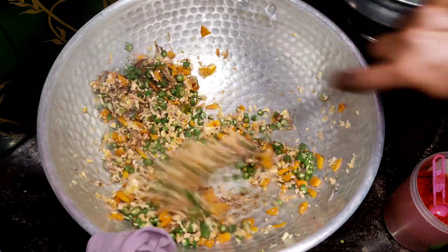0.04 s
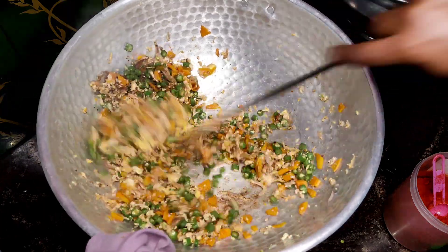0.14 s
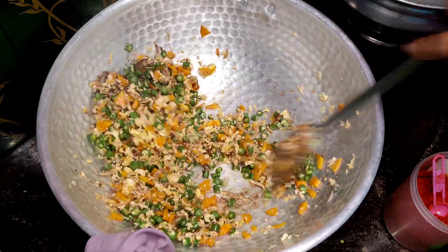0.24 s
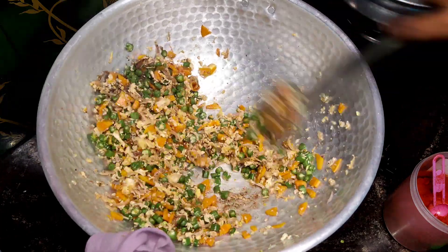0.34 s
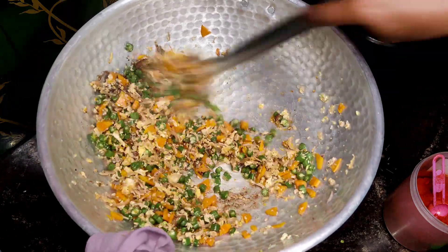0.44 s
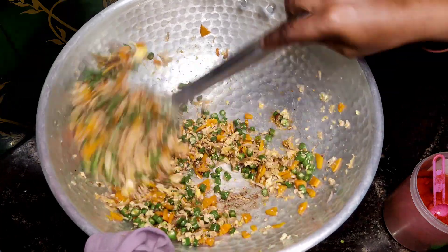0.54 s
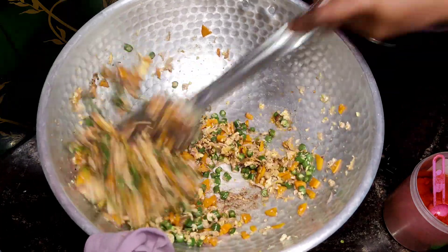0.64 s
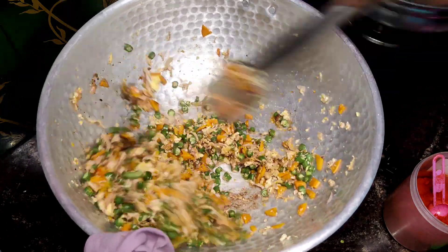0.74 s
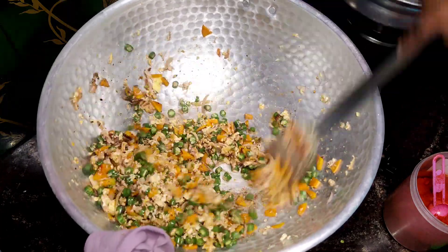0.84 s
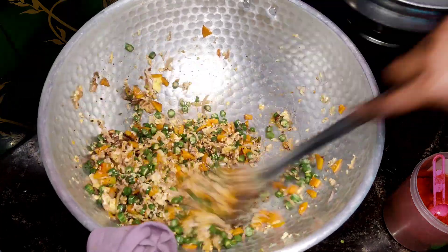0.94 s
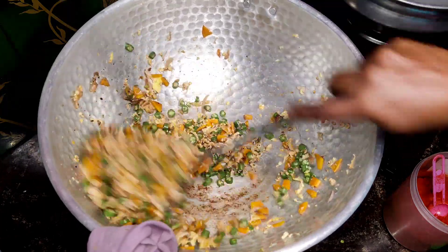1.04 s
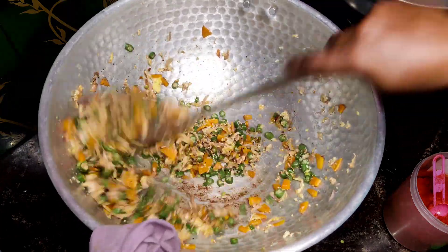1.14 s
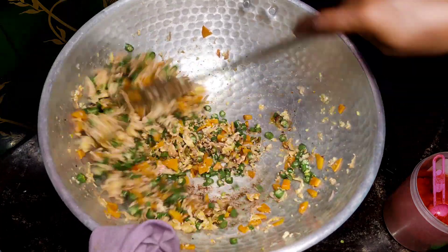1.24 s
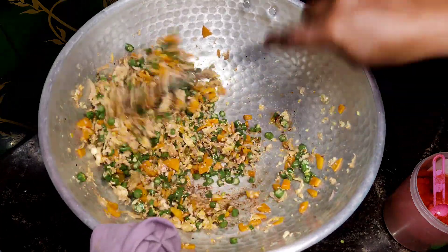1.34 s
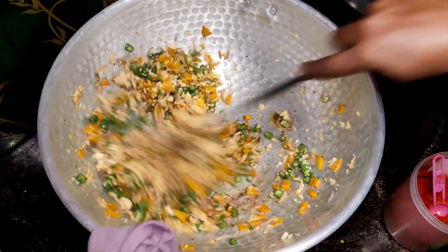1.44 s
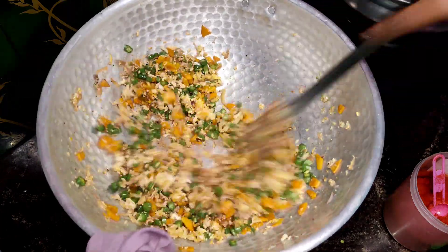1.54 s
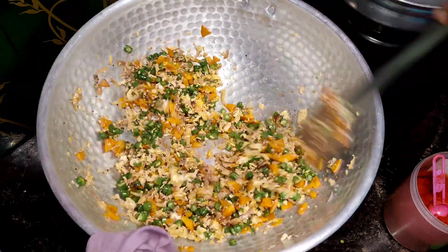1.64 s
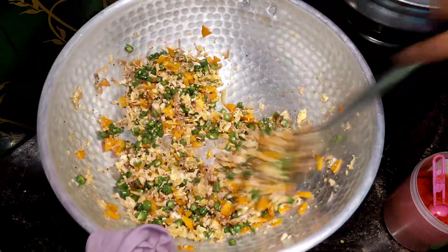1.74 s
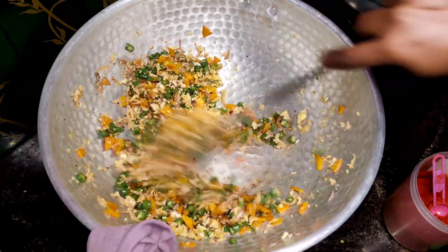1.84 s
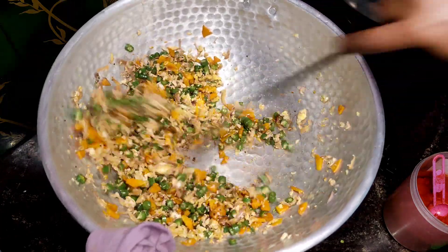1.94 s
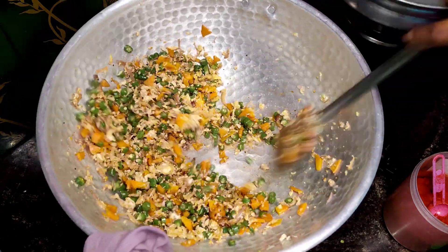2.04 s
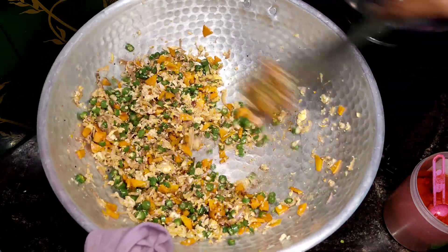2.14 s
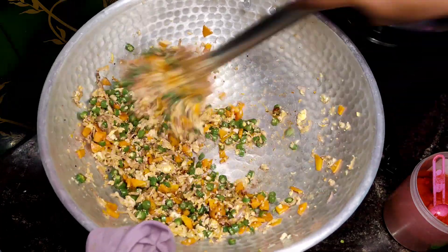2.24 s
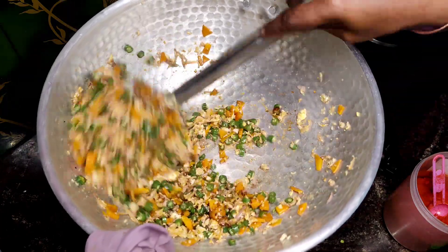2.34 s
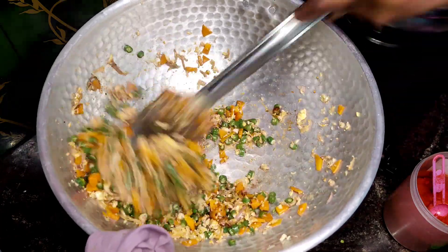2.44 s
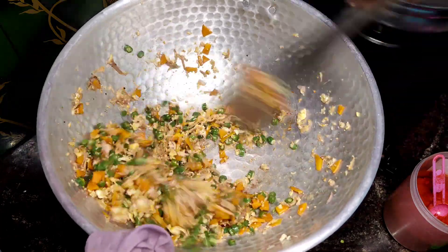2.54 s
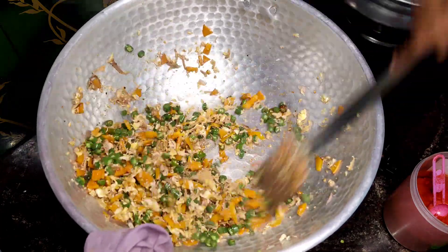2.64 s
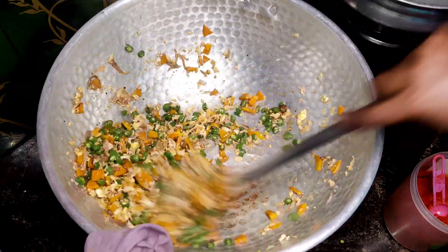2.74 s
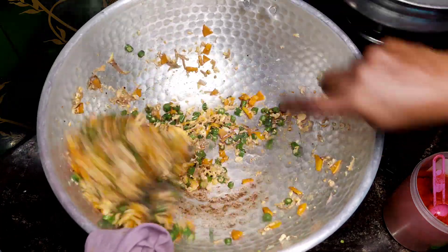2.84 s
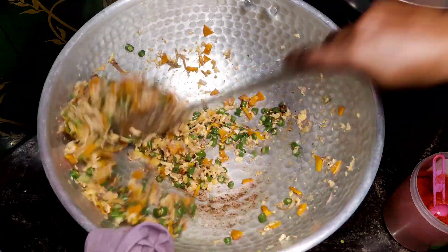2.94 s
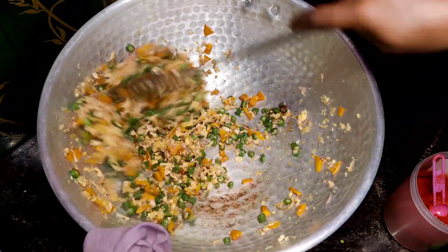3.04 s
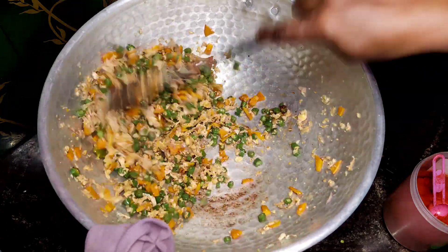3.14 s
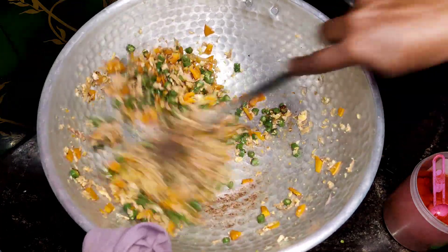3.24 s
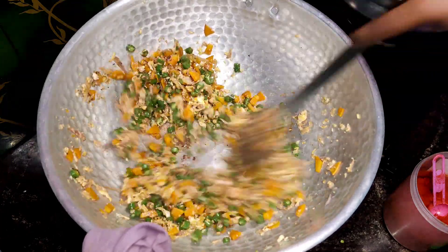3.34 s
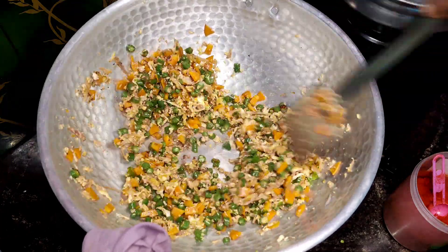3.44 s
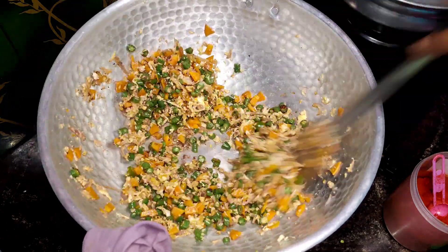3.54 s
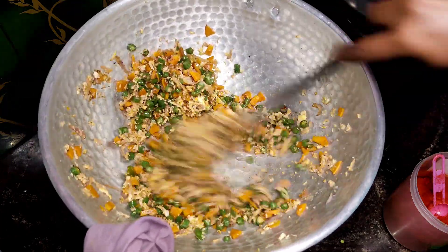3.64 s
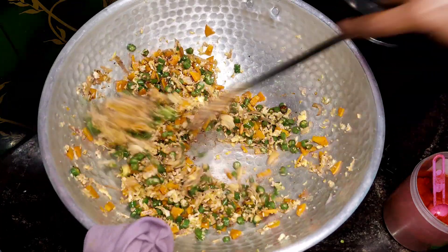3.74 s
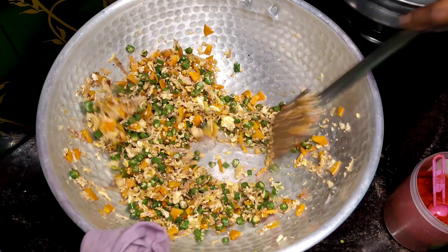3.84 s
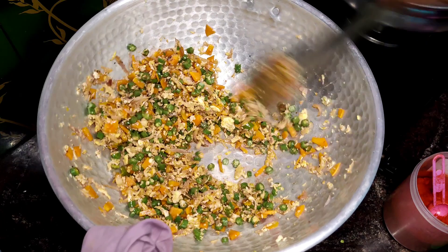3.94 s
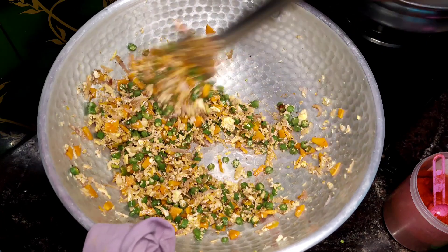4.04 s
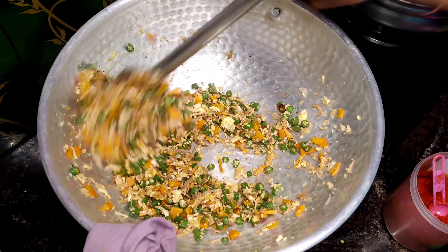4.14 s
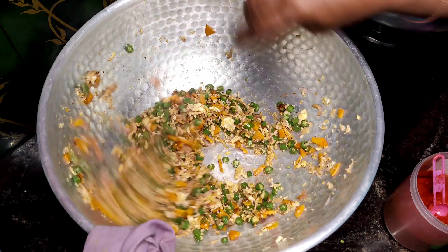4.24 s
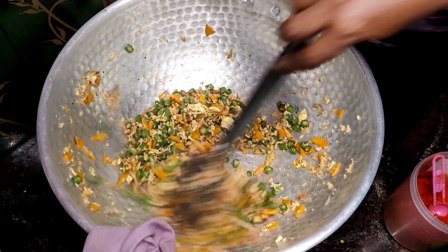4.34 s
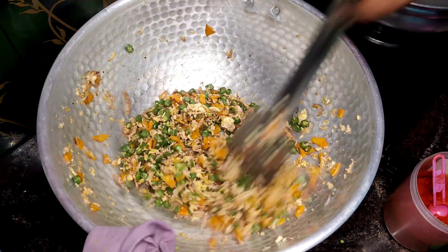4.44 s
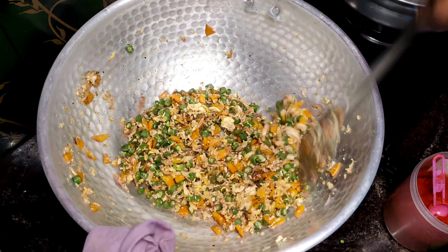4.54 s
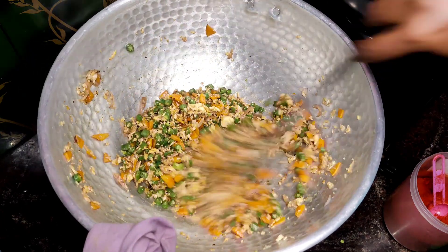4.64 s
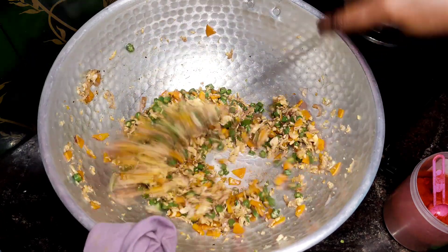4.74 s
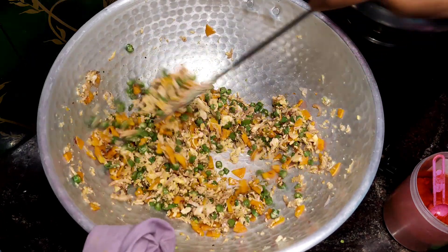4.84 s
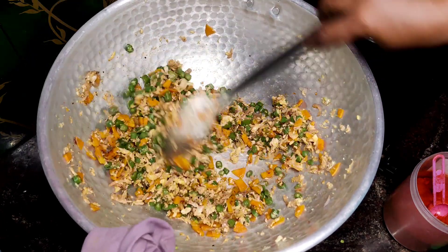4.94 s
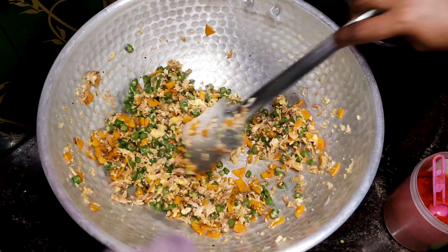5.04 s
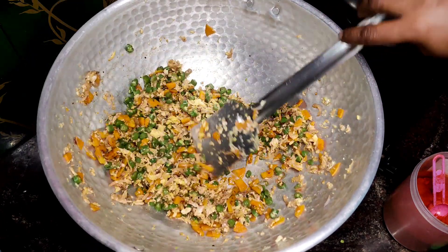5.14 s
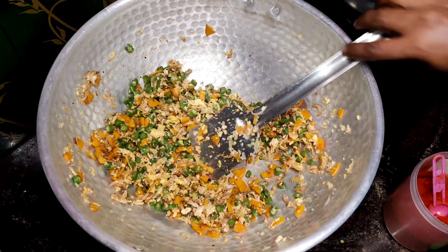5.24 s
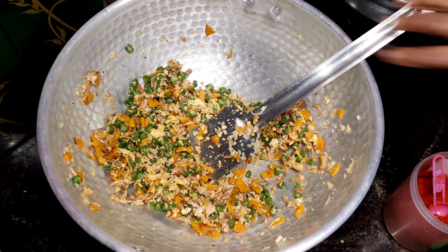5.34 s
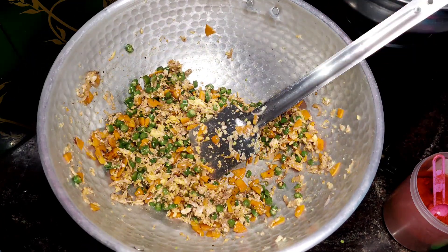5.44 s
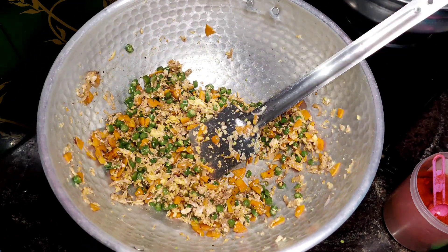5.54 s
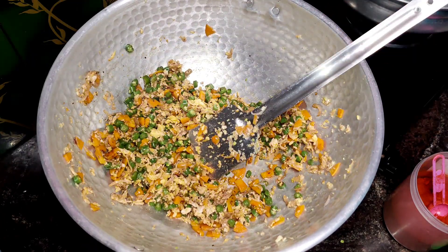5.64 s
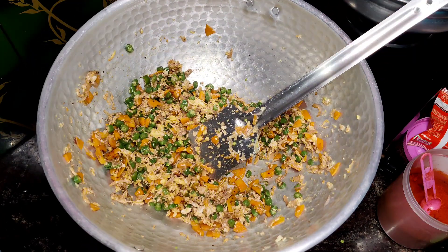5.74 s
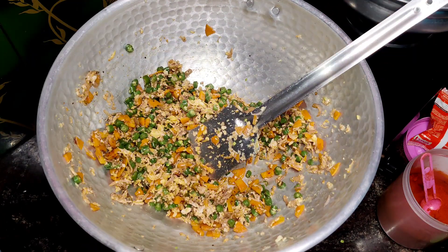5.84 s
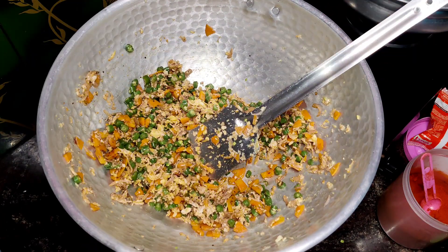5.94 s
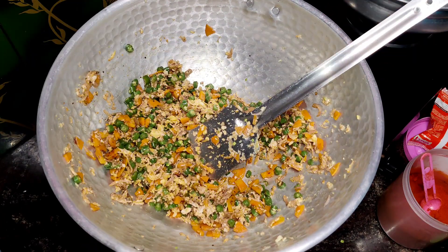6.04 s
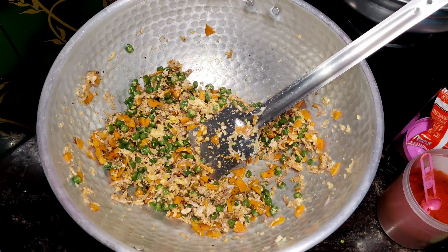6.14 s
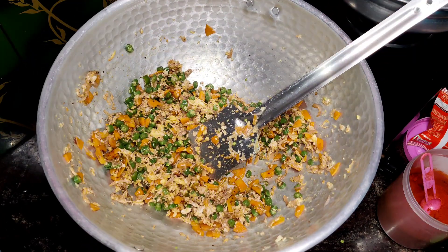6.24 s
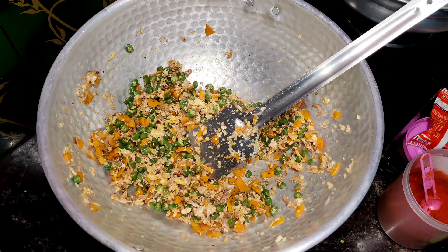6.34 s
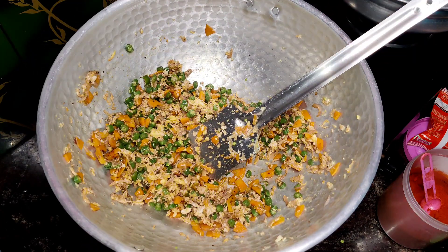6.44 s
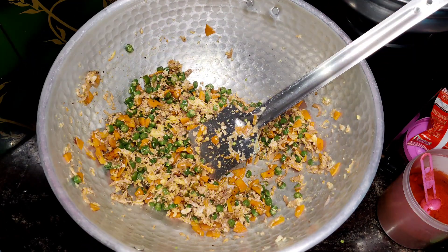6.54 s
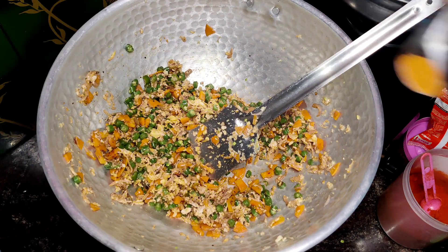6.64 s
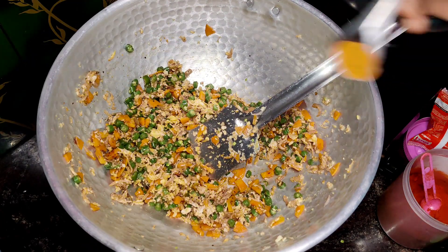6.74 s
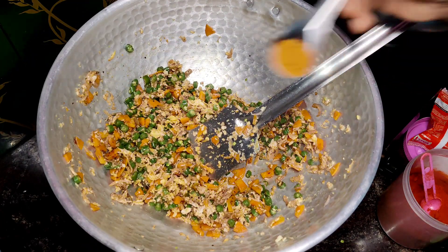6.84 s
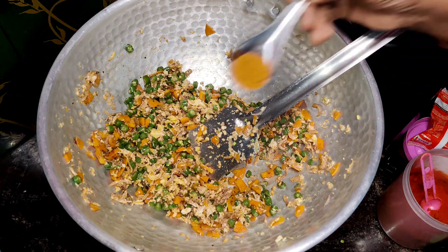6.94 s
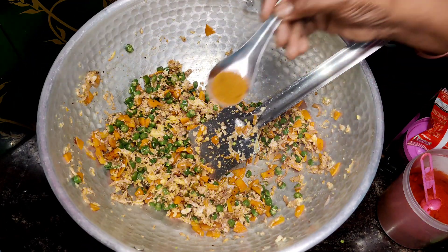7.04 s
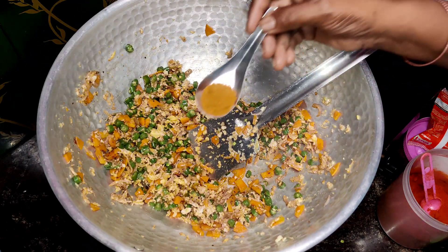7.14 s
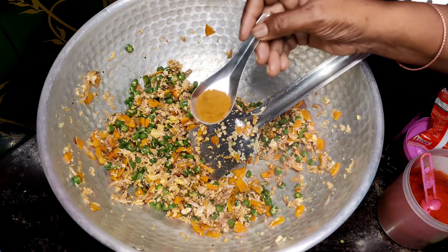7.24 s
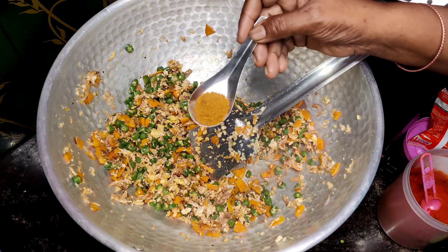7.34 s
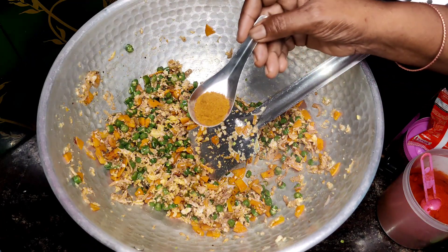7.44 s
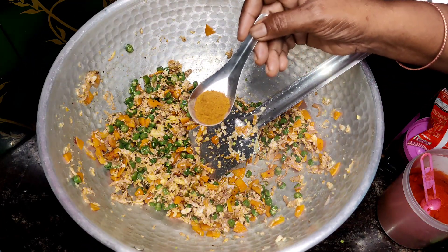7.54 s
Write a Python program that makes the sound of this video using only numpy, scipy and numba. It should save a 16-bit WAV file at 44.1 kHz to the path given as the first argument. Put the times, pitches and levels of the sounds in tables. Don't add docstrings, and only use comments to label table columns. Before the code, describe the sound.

Brisk steel clacks and short gritty scrapes in a frying pan, a last ringing clank, then a jar softly set down amid faint sizzle.

```python
import sys
import numpy as np
from numba import njit
from scipy import signal
from scipy.fft import rfft, irfft
from scipy.io import wavfile
from scipy.ndimage import uniform_filter1d

SR = 44100
rng = np.random.default_rng(int(sys.argv[2]) if len(sys.argv) > 2 else 0)


def transcribe(signal):
    frames = np.atleast_2d(signal).T
    limited = np.clip(frames, -1, 1)
    pcm = np.round(limited * 32767).astype(np.int16)
    wavfile.write(sys.argv[1], SR, pcm)


def level_to_linear(level):
    exponent = np.asarray(level, float) / 20
    return 10 ** exponent


N = 335160
TIME = np.arange(N) / SR

# start_s, edge_peak_db, middle_relative_db, bowl_relative_db
BLOWS = [(.001, -18, -17, -22), (0.0523, -26.5, -12, -7.5), (0.081, -17, -10, -10.5),
         (0.1118, -29, -8, -29), (0.2253, -40.5, -8, 5), (0.424, -28.5, 5, 0.5), (0.8721, 0, -15.5, -19.5),
         (0.9918, -18, -0.5, -14), (1.432, -20.5, -21, -9), (1.5871, -43, 2, 5),
         (1.7428, -11.5, -7.5, -15.5), (1.75, 0, -13, -18.5), (2.0606, -25, -6, -1),
         (2.155, -2.5, -18.5, -19.5), (2.2983, -16, -6, -23), (2.4309, -48, -13, 11),
         (2.6299, -3.5, -8, -13), (3.2077, -18.5, -9.5, 7), (3.2198, -24, -15, 10),
         (3.564, -12, -15, -24.5), (3.8653, -24.5, -1.5, -0.5), (3.9676, -15.5, -10, -14),
         (4.0143, -15, -19, -19), (4.2005, -32, 7, 8), (4.2653, -21, -11, 6), (4.2915, -26.5, -1, 8),
         (4.6848, -13, -20, -10), (4.7149, -11.5, 1.5, -22), (5.3261, -5, -4.5, -18.5)]
# full_pressure_s, end_s, edge_hiss_db, middle_relative_db, bowl_relative_db
SCRAPES = [(0.07, 0.104, -31.5, 1, -11), (0.439, 0.561, -27.5, -4, -1.5), (0.667, 0.67, -45, -18, 2),
           (0.979, 1.069, -30.5, -4.5, -6), (1.109, 1.108, -45.5, -6, 10), (1.28, 1.386, -57.5, -19, 6.5),
           (1.44, 1.434, -37, -11, -5), (1.52, 1.555, -44.5, 0.5, -5), (1.589, 1.602, -50.5, -8, 15.5),
           (1.841, 1.876, -29.5, 2.5, 0.5), (2.085, 2.066, -47.5, -11, 15), (2.205, 2.369, -30.5, -5, -7.5),
           (2.44, 2.44, -64, -6, -1), (2.692, 2.865, -30, -4.5, -6.5), (3.043, 3.12, -61, -16, 9.5),
           (3.264, 3.375, -42, -1, 1), (3.625, 3.677, -41.5, -4, -2), (4.076, 4.18, -27, -7.5, -2.5),
           (4.22, 4.259, -25.5, -8, 4.5), (4.325, 4.365, -32.5, -8, 2), (4.711, 4.744, -24, -4, -2),
           (4.888, 4.992, -59, -22, 10), (5.326, 5.378, -29, 1.5, -7.5)]
# delay_s, share
REBOUNDS = [(0, 1), (.0012, 0.4), (.0029, 0.28), (.0052, .3)]
# start_s, peak_db
CLINKS = [
    (.0805, -9),
    (.0945, -10),
    (.1105, -10),
    (.9918, -26),
    (1.86, -20),
    (2.2983, -14),
    (4.099, -17),
    (4.72, -18.5),
]
# start_s, peak_db
THUMPS = [
    (0.089, -31),
    (.47, -31),
    (1.599, -37),
    (2.638, -34.5),
    (3.651, -34),
    (3.97, -31.5),
    (4.69, -27.5),
    (5.329, -31),
]
# start_s, peak_db, centre_hz, left_minus_right_db
POPS = [(0.323, -34, 6360, -3.0), (0.6408, -26, 5430, -1.5), (0.8092, -27, 6300, -1),
        (1.3603, -24, 5420, -1), (3.8085, -34, 6160, -5), (4.5476, -26.5, 5750, 1), (5.5088, -32, 5630, -1),
        (5.5204, -31, 6200, 1), (5.682, -34, 5400, -1), (5.722, -31.5, 5600, -1),
        (6.0696, -39.5, 5900, -0.5), (6.127, -32.5, 3580, 6), (6.375, -37, 6300, 0),
        (6.4014, -40, 3400, -3), (6.6348, -39.5, 6600, 0), (6.8619, -30.5, 6400, -1),
        (7.245, -31, 6300, -1), (7.4144, -33.5, 2800, -1), (7.59, -28.5, 6250, 0)]
# start_s, peak_db
JAR_TAPS = [
    (5.813, -37),
    (5.828, -36),
    (5.911, -42),
]

# mode_hz, level_db, t60_s
JAR_MODES = [(465, -1.5, .05), (640, -1, .04), (915, -2, .03), (1248, 0, .025), (1500, 3, .025),
             (1700, 4, .025)]
# mode_hz, level_db, t60_s
ROCKING_MODES = [(98, -10, .14), (135, -18, .08), (183, -12, .12), (225, -12, .07), (268, -5, .08),
                 (301, 0, .22), (338, -5, .12)]
# mode_hz, level_db, t60_s
BOWL_MODES = [(362, -8, .1), (395, -4, .12), (455, 0, .14), (500, -7, .1), (555, -8, .12), (600, -10, .15),
              (695, -7, .12), (785, -12, .11), (850, -14, .1), (925, -13, .11), (1010, -16, .1),
              (1110, -18, .1)]
# mode_hz, level_db, t60_s
BLADE_MODES = [(1895, -10, .3), (2864, -8, .2), (3252, -5, .18), (3682, 0, .22), (3965, -5, .12),
               (4425, -10, .14), (5104, -9, .14), (6180, -8, .12)]
# mode_hz, level_db, t60_s
FREE_MODES = [(549, -3, .18), (721, -7, .16), (958, -11, .25), (1895, -12, .3), (2934, -12, .17),
              (3252, -2, .16), (3682, 0, .22)]

# frequency_hz, density_db
SHEET_SPECTRUM = [(650, -37), (1100, -13), (1490, -6), (1880, -3.5), (2330, -8), (2920, 0.5), (3300, -5.5),
                  (3450, 1.5), (4720, -3), (6310, 0.5), (7060, -8), (8260, -16), (9140, -29.5), (15100, 22),
                  (16000, -50)]
# frequency_hz, density_db
SIZZLE_SPECTRUM = [(120, -16), (200, -5.5), (410, -5.5), (560, -4), (603, -8.5), (686, 0), (738, -5),
                   (937, -2.5), (1480, -7), (2770, -1), (3720, -2.5), (6950, 0.5), (9160, -19.5),
                   (15100, -24), (16200, -38)]
# frequency_hz, density_db
RUMBLE_SPECTRUM = [(8.8, -38), (15, 2), (54, 3), (81, -16.5), (118, -7.5), (156, -18.5), (169, -10),
                   (180, -14), (260, -50), (340, -77), (570, -120)]
# time_s, level_db
FRYING = [
    [(0, -42), (1.2, -45.5), (1.6, -43), (2.5, -45), (3.1, -46.5), (3.8, -44.5), (4.6, -43), (5.2, -44.5),
     (5.735, -45.5)],
    [(5.745, -54.5), (6.2, -52.5), (6.9, -51.5), (7.6, -51)],
]
# time_s, level_db
RUMBLE_COURSE = [(0, -52), (3.1, -50.5), (5.9, -58), (7.3, -50), (7.6, -47.5)]
# time_s, level_db
DRONE_COURSE = [(5.7, -80), (6.0, -60.5), (6.65, -61), (7.1, -76)]
# frequency_hz, likeness_0_to_1
COHERENCE = [(60, 0.94), (300, 0.98), (700, 0.38), (1500, 0.07), (6000, 0.11), (9000, 1), (15000, 0.7)]

# edge_db_per_s, middle_db_per_s, bowl_db_per_s, rocking_db_per_s
LIFT_DB_S = (230, 224, 190, 188)
# edge_db, middle_db, bowl_db, rocking_db
SKID_DB = (-20, -21, -14.5, -18)
# from_hz, top_hz, share_quiet, share_loud, side_share
TREBLE_KEPT = (8300, 15800, .5, .3, .8)

RISE_DB_S, SAG_DB_S = 296, 7
SKID_SHARE, SKID_DB_S = 0.68, 270
BLADE_SHARE, BLADE_DB = 0.65, -12
ROCK_SHARE, ROCK_DB = 0.99, -11
ROCK_POWER, ROCK_BLOW_DB = 1.222, 1.5
STEADY_SHARE = 1.2
CHANGE_S, FADE_S, JOLT_S = 5.738, .02, .873


def spread(hz, table):
    f, v = np.transpose(table)
    return np.interp(np.log(np.maximum(hz, 1)), np.log(f), v)


def unit(x):
    return x / np.sqrt(np.mean(x ** 2))


def colour(x, table):
    return irfft(rfft(x) * level_to_linear(spread(np.arange(N // 2 + 1) * SR / N, table)), N)


def above(x, hz):
    return signal.sosfilt(signal.butter(2, hz, "high", fs=SR, output="sos"), x)


def below(x, hz):
    return signal.sosfilt(signal.butter(4, hz, fs=SR, output="sos"), x)


def walk(rate):
    k = int(SR / rate)
    held = np.repeat(rng.standard_normal(N // k + 1), k)
    return 1.314 * uniform_filter1d(uniform_filter1d(held, k), k)[:N]


def grit(rate, scatter_db):
    clicks = (rng.random(N) < rate / SR) * rng.standard_normal(N)
    return unit(clicks * level_to_linear(scatter_db * rng.exponential(size=N)))


def stereo(source):
    c = np.clip(spread(np.arange(N // 2 + 1) * SR / N, COHERENCE), 0, 1)
    mid = rfft(source()) * np.sqrt(1 + c)
    side = rfft(source()) * np.sqrt(1 - c)
    return irfft(np.array([mid + side, mid - side]), N) / np.sqrt(2)


@njit(fastmath=True)
def ring(force, place, pole, shape, ports):
    out, count = np.zeros((2, len(force))), len(pole)
    a, b = pole.real.copy(), pole.imag.copy()
    re, im = np.zeros(count), np.zeros(count)
    for start in range(0, len(force), 128):
        push = shape[:, 3] + np.cos(shape[:, 0] + shape[:, 1] * place[start])
        side = ports[:, 1] * np.cos(shape[:, 2] + shape[:, 1] * place[start])
        mid, turned, straight = ports[:, 0].real.copy(), side.imag.copy(), side.real.copy()
        for i in range(start, min(start + 128, len(force))):
            m, s, f = 0., 0., force[i]
            for k in range(count):
                x = re[k] * a[k] - im[k] * b[k] + push[k] * f + 1e-18
                y = re[k] * b[k] + im[k] * a[k]
                re[k], im[k] = x, y
                m += mid[k] * y
                s += straight[k] * y + turned[k] * x
            out[0, i], out[1, i] = m + s, m - s
    return out


def body(hz, db, t60, blows, scrape, place, always=0.):
    pole = np.exp(2j * np.pi * hz / SR - np.log(1000) / (t60 * SR))
    place_power = 1 + 2 * always ** 2
    gain = level_to_linear(db) / np.sqrt(np.sum(level_to_linear(2 * db)) * place_power)
    steady = np.sqrt(np.sum(gain ** 2 / (1 - abs(pole) ** 2)) * place_power / 4)
    turn = 2 * np.pi * rng.random((len(hz), 4))
    alike = np.clip(spread(hz, COHERENCE), 0, 1)
    mid, side = np.sqrt((1 + alike) / 2), np.sqrt(1 - alike) * np.exp(1j * turn[:, 3])
    ports = gain[:, None] * np.column_stack([mid, side])
    wavenumber = (.5 + turn[:, 1] / (2 * np.pi)) * np.sqrt(hz / 500)
    shape = np.column_stack([turn[:, 0], wavenumber, turn[:, 2], always + 0 * hz])
    return ring(blows + scrape / steady, place, pole, shape, ports)


def thicket(lo_hz, hi_hz, t60, count, table):
    chance = rng.random((count, 2))
    hz = lo_hz + (hi_hz - lo_hz) * (np.arange(count) + chance[:, 0]) / count
    decay = t60 * (.5 + chance[:, 1])
    return hz, spread(hz, table) - 10 * np.log10(decay), decay


def strikes(db, push_s, s=np.array(BLOWS)[:, 0], chatter=((0, 1),)):
    x = np.zeros(N)
    x[(s * SR).astype(int)] = level_to_linear(db)
    push = np.hanning(int(push_s * SR) + 3)
    first = np.convolve(x, push / push.sum())[:N]
    return sum(share * np.roll(first, int(late_s * SR)) for late_s, share in chatter)


def sizzle():
    rows = np.concatenate(FRYING)
    fry = stereo(lambda: unit(colour(rng.standard_normal(N) + .4 * grit(1500, 1.5), SIZZLE_SPECTRUM)))
    return fry * level_to_linear(np.interp(TIME, *rows.T) + .5 * walk(11))


def rumble():
    low = stereo(lambda: unit(colour(rng.standard_normal(N), RUMBLE_SPECTRUM)))
    low = low * level_to_linear(np.interp(TIME, *np.transpose(RUMBLE_COURSE)) + 3.7 * walk(3.35))
    drone = np.sin(2 * np.pi * np.cumsum(153 * (1 + 0.0077 * walk(4))) / SR)
    return low + drone * level_to_linear(np.interp(TIME, *np.transpose(DRONE_COURSE)) + 1.1 * walk(13))


def pressure(part, stroke_db, blow_db):
    t, landings = TIME[::32], np.array(BLOWS)[:, 0]
    late = t - landings[:, None]
    skid_db = SKID_SHARE * blow_db[:, None] + SKID_DB[part] - SKID_DB_S * abs(late)
    power = np.sum(level_to_linear(2 * skid_db) * (late > 0), axis=0)
    for (full_s, end_s), db in zip(np.array(SCRAPES)[:, :2], stroke_db):
        fall = RISE_DB_S * np.maximum(full_s - t, 0) + SAG_DB_S * np.maximum(t - full_s, 0)
        fall = fall + LIFT_DB_S[part] * np.maximum(t - end_s, 0)
        landed = t > landings[landings < full_s].max()
        power = power + level_to_linear(2 * (db - fall)) * landed
    return np.interp(TIME, t, np.sqrt(power))


def rocking(blow_db, scrape, place):
    thump_s, thump_db = np.transpose(THUMPS)
    thumps = strikes(thump_db + 14, push_s=0.007, s=thump_s)
    blows = above(strikes(blow_db, push_s=0.00072), 270) + thumps
    return body(*np.transpose(ROCKING_MODES), blows, scrape, place, 2 * STEADY_SHARE)


def rasp(db, edge, bumps):
    tick_s = 0.0028
    tick = level_to_linear(-33) * signal.lfilter([1], [1, -np.exp(-1 / (tick_s * SR))], strikes(db, push_s=0))
    hiss = stereo(lambda: above(above(rng.standard_normal(N), 5300), 5300))
    return hiss * (level_to_linear(-24.5) * edge + tick) * bumps


def spatula():
    _, db, middle_db, bowl_db = np.transpose(BLOWS)
    blade_db = BLADE_SHARE * middle_db + BLADE_DB
    rock_db = ROCK_POWER * (db + bowl_db) + ROCK_BLOW_DB
    hiss_db, sheet_db, flat_db = np.transpose(SCRAPES)[2:]
    place = 3.0 * TIME + 1.527 * walk(5)
    bumps = level_to_linear(1.17 * walk(70))
    fine = bumps * grit(5000, 0.95)
    coarse = bumps * grit(1200, 1.4)
    edge = pressure(0, hiss_db, db)
    middle = pressure(1, hiss_db + sheet_db, db + middle_db)
    bowl = pressure(2, hiss_db + flat_db, db + bowl_db)
    deep = pressure(3, hiss_db + ROCK_SHARE * flat_db + ROCK_DB, rock_db)

    modes = thicket(3603, 9224, 0.017, count=80, table=SHEET_SPECTRUM)
    crack = body(*modes, strikes(db, push_s=0, chatter=REBOUNDS), level_to_linear(-1) * edge * fine, place)
    modes = thicket(3600, 8600, 0.071, count=120, table=SHEET_SPECTRUM)
    sheet = body(*modes, strikes(db - 60, push_s=0, chatter=REBOUNDS), level_to_linear(-4.0) * edge * fine, place)
    modes = thicket(1109.0, 3590, 0.028, count=70, table=SHEET_SPECTRUM)
    mids = body(*modes, strikes(db + middle_db, push_s=0, chatter=REBOUNDS), middle * fine, place)
    blows = strikes(db + bowl_db + 1.0, push_s=0.00072)
    lows = body(*np.transpose(BOWL_MODES), blows, level_to_linear(-8.5) * bowl * coarse, 0.588 * place, STEADY_SHARE)
    modes = thicket(335.4, 1236, 0.091, count=26, table=np.array(BOWL_MODES)[:, :2])
    blows = strikes(db + bowl_db - 4.0, push_s=0.00027)
    knock = body(*modes, blows, level_to_linear(-1.5) * bowl * coarse, place, .5 * STEADY_SHARE)
    blows = strikes(db + blade_db, push_s=0)
    blade = body(*np.transpose(BLADE_MODES), blows, level_to_linear(-28) * edge * fine, 0.232 * place, STEADY_SHARE)
    rock = rocking(rock_db, deep * coarse, place)

    ring_out = above(above(crack + sheet + blade, 2550) + mids, 1070)
    ring_out = ring_out + above(below(lows + knock, 1170), 382) + above(above(rock, 81), 81)
    port = signal.butter(6, 8300, fs=SR, output="sos")
    ring_out = signal.sosfilt(port, ring_out) + level_to_linear(-49.5) * ring_out
    return (ring_out + rasp(db, edge, bumps)) * level_to_linear(np.array([[-.4], [.4]]))


def clinks():
    (s, db), (hz, mode_db, t60) = np.transpose(CLINKS), np.transpose(BLADE_MODES)
    blows = strikes(db, push_s=.0001, s=s)
    return above(body(hz, mode_db / 2, .17 * t60, blows, 0, 3.04 * TIME, STEADY_SHARE), 2100)


def pops():
    out, t = np.zeros((2, N + 2000)), np.arange(2000) / SR
    band = signal.butter(2, [650, 7500], "band", fs=SR, output="sos")
    for s, db, hz, pan_db in POPS:
        puff = signal.sosfilt(band, rng.standard_normal((2, 2000))) * np.exp(-t / 0.0096)
        bubble = np.sin(2 * np.pi * hz * t) * np.exp(-t / 0.00067)
        gain = level_to_linear(db + np.array([[pan_db], [-pan_db]]) / 2)
        out[:, int(s * SR):][:, :2000] += gain * (1.19 * bubble + 0.53 * puff)
    return out[:, :N]


def jolt(db=-23, rise_s=0.0059, fall_s=0.085, swing_hz=5.0):
    t = np.maximum(TIME - JOLT_S, 0)
    return level_to_linear(db) * (np.exp(-t / fall_s) - np.exp(-t / rise_s)) * np.cos(2 * np.pi * swing_hz * t)


def laid_down(db=-8):
    blow = strikes(db, push_s=.0001, s=np.array(BLOWS)[-1:, 0])
    return above(body(*np.transpose(FREE_MODES), blow, 0, TIME, 3 * STEADY_SHARE), 380)


def jar():
    s, db = np.transpose(JAR_TAPS)
    drag = level_to_linear(-52) * (TIME > s[0]) * np.exp(-np.abs(TIME - s[0]) / 0.095) * rng.standard_normal(N)
    taps = strikes(db, push_s=.0002, s=s)
    return above(body(*np.transpose(JAR_MODES), taps, drag, TIME, STEADY_SHARE), 330)


def scene():
    near = spatula() + pops() + jar() + laid_down()
    t = np.arange(int(.3 * SR)) / SR
    walls = rng.standard_normal((2, len(t))) * np.exp(-np.log(1000) * t / 0.75) * (t > .004)
    echo = signal.fftconvolve(near, walls, axes=1)[:, :N]
    return near + level_to_linear(-53.5) * echo + sizzle() + rumble() + jolt() + clinks()


def patchy_treble(x):
    pad, (lo_hz, hi_hz, quiet, loud, side_share) = 1024 - 136, TREBLE_KEPT
    both = np.pad(np.array([x[0] + x[1], x[0] - x[1]]) / 2, ((0, 0), (pad, 0)))
    hz, _, z = signal.stft(both, SR, "cosine", 2048, 1024)
    db = 10 * np.log10(np.sum(abs(z[0]) ** 2, axis=0) + 1e-12)
    kept = np.interp(db, [-45, -30], [quiet, loud])
    luck = np.repeat(rng.random((205, z.shape[2] // 2 + 1)), 5, axis=0)
    luck = luck.repeat(2, axis=1)[:, :len(db)]
    treble = (hz > lo_hz)[:, None]
    for k, share in enumerate((kept, side_share * kept)):
        z[k] *= np.where(treble, (luck < share) / np.sqrt(share), 1)
    z[:, hz > hi_hz] = 0
    mid, side = signal.istft(z, SR, "cosine", 2048, 1024)[1][:, pad:pad + N]
    return np.array([mid + side, mid - side])


def band_limit(x):
    return signal.sosfilt(signal.butter(12, 16500, fs=SR, output="sos"), x)


def record(dry):
    fade = np.where(TIME < CHANGE_S, 1, np.clip(0.016 + (TIME - CHANGE_S) / FADE_S, 0, 1))
    mix = patchy_treble(np.clip(dry, -.95, .95)) * fade
    return band_limit(mix)


dry = scene()
out = record(dry)
transcribe(out)
```